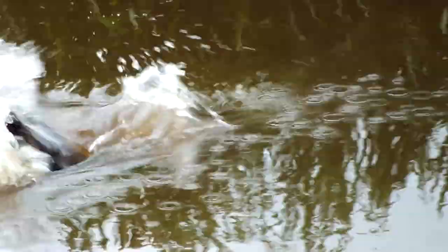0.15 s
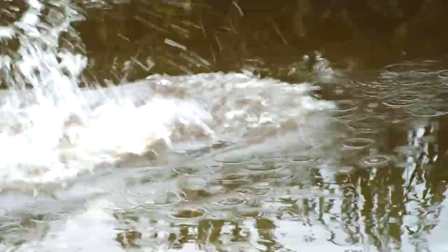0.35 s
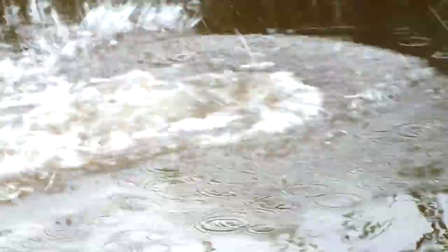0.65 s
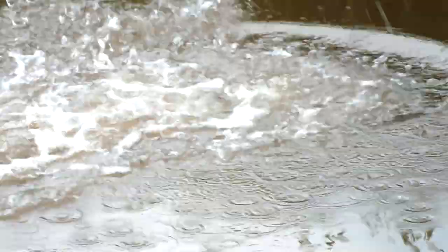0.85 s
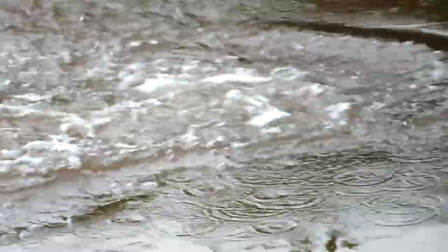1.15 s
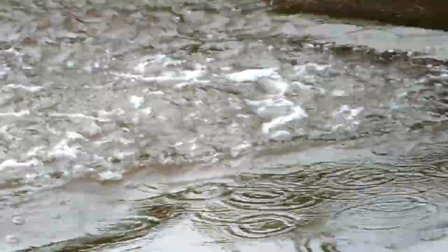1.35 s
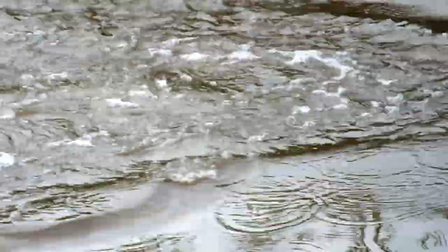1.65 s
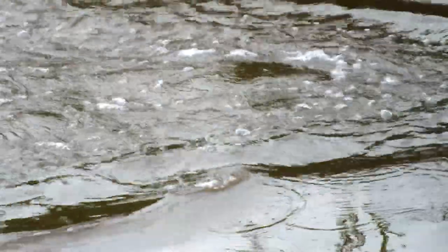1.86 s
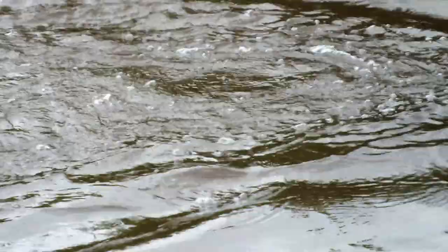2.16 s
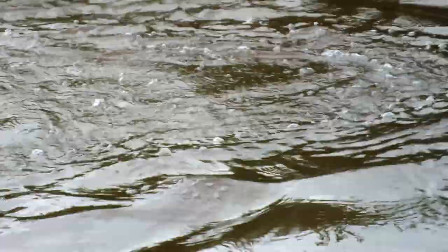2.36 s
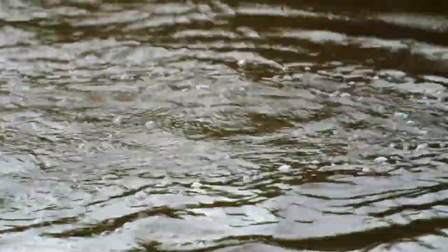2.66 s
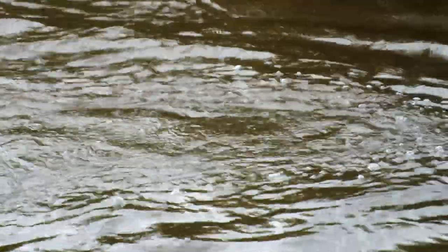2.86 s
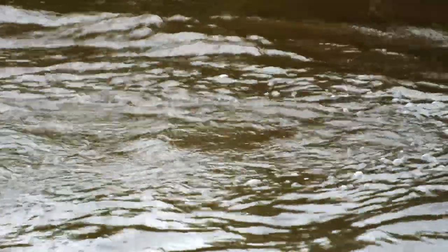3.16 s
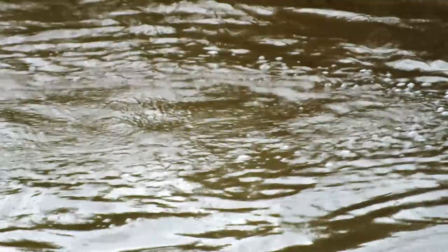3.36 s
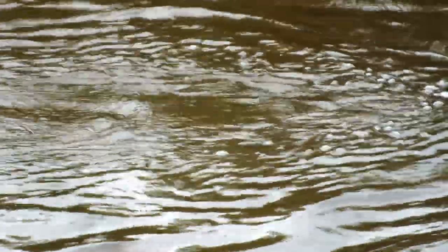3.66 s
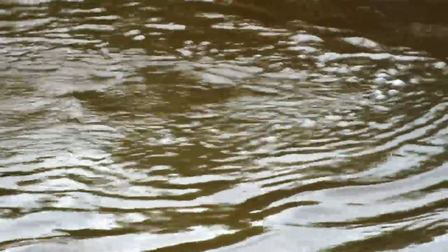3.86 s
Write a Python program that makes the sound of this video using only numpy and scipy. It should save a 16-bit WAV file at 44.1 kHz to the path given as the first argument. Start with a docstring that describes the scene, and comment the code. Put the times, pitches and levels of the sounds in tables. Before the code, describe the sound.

An animal splashes into a river, followed by quiet birdsong and handling knocks.

```python
"""On a quiet river bank, a beaver slaps the water with its tail and dives. Trapped air resonates as
bubbles: large pockets gulp, foam churns, and spray rains back, thinning to single droplets.
A small bird sings frequency-modulated tones, whistles and trills, scattered by the trees.
Close by, bumps and knocks excite the modes of a hand-held microphone, and a sleeve rustles by friction.
Soft open air and a distant hum lie underneath."""
import sys
import numpy as np
from scipy import signal
from scipy.io import wavfile

SR = 44100
rng = np.random.default_rng(int(sys.argv[2]) if len(sys.argv) > 2 else 0)


def store_wav(level_fs):
    """Save 16-bit WAV to argv[1]."""
    pcm = np.round(np.clip(np.atleast_2d(level_fs), -1, 1) * 32767)
    wavfile.write(sys.argv[1], SR, pcm.T.astype(np.int16))


N = 176400
T = np.arange(N) / SR


# gurgle of the cavity left by the tail: (time [s], level [dB])
GURGLE = [(0.0, -32), (0.03, -49), (0.054, -32), (0.342, -40.5), (0.366, -43.5), (1.022, -61), (1.1, -80)]
# the tail's sharp slap on the water (first row), then single large bubbles: (time [s], frequency [Hz], level
# [dB], ring length [cycles])
GULPS = [(0.0533, 676, -12, 4.4), (.071, 403.6, -25, 22), (0.09, 2300, -23.5, 4), (.122, 505, -25, 21),
         (.141, 399, -24, 19), (.149, 383, -18, 10.3), (0.173, 1210, -21.5, 10.4), (0.199, 395, -26, 14),
         (0.218, 390, -24.5, 17), (0.264, 427, -28, 13), (0.296, 440, -21.5, 13), (0.33, 481, -26.5, 24),
         (.372, 920, -32.5, 29), (.497, 837, -34, 47), (.582, 1680, -30.5, 26), (0.655, 2190, -26, 4.3),
         (.716, 1830, -24.5, 9.2), (.717, 2750, -28, 20), (1.04, 2100, -45.5, 35)]

def cavity():
    """Bubble resonance: trapped air is a spring and the water a mass, so large pockets ring low."""
    swarm = bubbles(per_s=1100, low_hz=326.5, high_hz=607, cycles=12.1, size_db=2.5, spread_db=3.5)
    out = level(GURGLE) * from_db(-3) * swarm
    for s, hz, db, cycles in GULPS:
        add(out, s, from_db(db) * bubble(hz, cycles))
    return out


# churning of the foam: (time [s], level [dB])
FOAM_ENVELOPE = [(0, -39), (.035, -42.5), (.055, -33.5), (.1, -37.5), (.21, -40), (.265, -36), (.33, -35.5),
                 (.41, -41.5), (.55, -40), (.67, -39), (.75, -45), (.9, -48.5), (1.0, -55.5), (1.25, -92),
                 (1.45, -85)]
# colour of the foam: (frequency [Hz], level [dB])
FOAM_SPECTRUM = [(350, -16), (600, -7), (645, -16), (860, 0.5), (1080, -15), (1230, -0.5), (1500, -4),
                 (2100, 2.5), (2950, -17), (3410, -17.5), (7000, -34.5), (9100, -61), (15400, -120)]
# ringing hollows in the foam: (frequency [Hz], bandwidth [Hz], level [dB])
HOLLOWS = [(864, 112, -5.5), (1235, 210, -6), (1760, 200, -13.5)]
# left-right likeness of the water sounds: (frequency [Hz], correlation [-1 to 1])
WATER_CORRELATION = [(300, 0.98), (1400, 0.8), (3100, 0.17), (7000, 0.29), (15000, 1)]

def foam():
    """Incoherent superposition: many small bubbles merge into noise, while hollows ring in narrow bands."""
    ringing = from_db(-5.5) * bubbles(per_s=1800, low_hz=775, high_hz=4164, cycles=23,
                                      size_db=3, spread_db=5.5, spectrum=FOAM_SPECTRUM)
    for hz, width, db in HOLLOWS:
        ringing += from_db(db - 14 * T) * band(hz - width / 2, hz + width / 2, size=N)
    churn = from_db(-5) * noise(FOAM_SPECTRUM, WATER_CORRELATION, patchy_db=4, flicker_hz=28)
    return level(FOAM_ENVELOPE) * (ringing + churn)


# air buffeting the microphone as the tail comes down: (time [s], level [dB])
BUFFET_ENVELOPE = [(0, -33), (.04, -43), (.1, -47), (.2, -55)]
# colour of the buffet: (frequency [Hz], level [dB])
BUFFET_SPECTRUM = [(20, -18), (45, 11), (75, -7), (130, -9), (300, -36)]

def tail_slap():
    """Volume displacement: the tail's push radiates one deep pressure pulse and drives a puff of air."""
    from_peak = T - .0785
    thump = from_db(-31) * np.exp(-(from_peak / .011) ** 2) * np.cos(2 * np.pi * 75 * from_peak)
    buffet = level(BUFFET_ENVELOPE) * noise(BUFFET_SPECTRUM, WATER_CORRELATION, patchy_db=0)
    return (thump + buffet) * pan(db=3)


# spray thrown up and falling back: (time [s], level [dB])
SPRAY_ENVELOPE = [(0, -57.5), (.035, -64), (.07, -57), (.2, -59.5), (.25, -54), (.27, -47), (.3, -59),
                  (.38, -58), (.46, -56), (.66, -56.5), (.76, -59), (.95, -68), (1.1, -71), (1.45, -77)]
# hiss of the spray: (frequency [Hz], level [dB])
SPRAY_SPECTRUM = [(2500, 6.5), (4000, 18), (6000, -15), (8000, 6), (11000, -5.5), (14000, -25),
                  (16000, -13)]
# single sharp drops: (time [s], frequency [Hz], level [dB])
DROPS = [(.267, 6400, -30.5), (.654, 4800, -25.5), (.917, 12100, -45), (.941, 6700, -36), (.985, 5900, -30),
         (1.006, 6230, -41), (1.141, 12000, -45), (1.198, 10300, -29.5), (1.199, 5800, -39),
         (1.258, 8000, -38), (1.311, 10000, -38), (1.321, 8550, -43), (1.365, 12500, -39),
         (1.42, 11800, -37)]

def spray():
    """Air entrainment: falling drops ring as tiny bubbles, a hiss when dense and ticks when sparse."""
    shower = bubbles(per_s=2800, low_hz=3040, high_hz=14300, cycles=13, size_db=3, spread_db=4)
    hiss = noise(SPRAY_SPECTRUM, WATER_CORRELATION, patchy_db=6.5, flicker_hz=56)
    out = level(SPRAY_ENVELOPE) * (from_db(-4) * shower + from_db(2.5) * hiss)
    for s, hz, db in DROPS:
        add(out, s, from_db(db) * bubble(hz, cycles=5.1))
    # a fine patter rises from 0.3 to 0.8 s, then weakens and is gone at 1.46 s
    patter = bubbles(per_s=700, low_hz=6000, high_hz=13000, cycles=9, size_db=4, spread_db=4)
    fade = np.interp(T, [.3, .8, 1.32, 1.46], [0, 1, 1, 0])
    out += fade * from_db(-64 - 12 * np.maximum(T - .8, 0)) * patter
    # all but the very top lies to the left
    lower = signal.sosfiltfilt(signal.butter(2, 9500, fs=SR, output="sos"), out + 1e-18)
    top = out - lower
    return lower * pan(db=8) + top


def note(length, first_hz, middle_hz, last_hz, db, swell_db, trill_hz=0, depth_first=0, depth_last=0):
    """Frequency modulation: a whistle wavers along an arc, and a trill sweeps it up and down."""
    t = T[:int(length * SR)]
    progress = t / length
    arc = np.polyfit([0, .5, 1], [first_hz, middle_hz, last_hz], 2)
    hz = np.polyval(arc, progress) + 18 * drift(90)[:len(t)]
    depth = np.maximum(depth_first + (depth_last - depth_first) * progress, 0)
    depth *= 1 + .15 * drift(20)[:len(t)]
    turn = 2 * np.pi * trill_hz * t
    sweep = -depth * np.cos(turn + .18 * np.cos(turn))   # climbs slowly, falls fast
    pulse_db = 5 * sweep / max(depth_first, depth_last, 1)   # louder at the top of each sweep
    edges = np.sin(np.pi / 2 * np.clip(np.minimum(t, length - t) / .021, 0, 1)) ** 2
    envelope = edges * from_db(db + swell_db * (progress - .5) + pulse_db)
    return envelope * np.sin(2 * np.pi * np.cumsum(hz + sweep) / SR)


# plain notes: (time [s], length [s], first pitch [Hz], middle pitch [Hz], last pitch [Hz],
# level [dB], swell [dB])
WHISTLES = [(1.865, .055, 1920, 1900, 1780, -54, 0), (1.92, .045, 2780, 2640, 2200, -51, 10),
            (1.943, .073, 2420, 1985, 1960, -39, 4), (2.12, .07, 2480, 2750, 3050, -58, 0),
            (2.148, .1, 1880, 2025, 1920, -42, 16), (2.236, .046, 1900, 1940, 1860, -40.5, -3),
            (2.575, .08, 2920, 2900, 2920, -55, 5), (2.643, .055, 2860, 3010, 2720, -38.5, -2),
            (2.68, .048, 2860, 2590, 2470, -41.5, 3), (3.202, .092, 1950, 1925, 1740, -39.5, -5),
            (3.28, .08, 1800, 1650, 1600, -53, 0), (3.75, .085, 2190, 2160, 2150, -54, 2)]
# swept notes: (the columns of WHISTLES, sweep rate [Hz], first depth [Hz], last depth [Hz])
TRILLS = [(2.271, .198, 2030, 2130, 2230, -46, -3, 30.5, 210, 320),
          (2.955, .205, 2380, 2260, 2150, -42, 13, 52, 330, -60)]

def bird():
    """Scattering: the direct song is followed by a faint, exponentially decaying echo from the trees."""
    song = np.zeros(N)
    for s, *shape in WHISTLES + TRILLS:
        add(song, s, note(*shape))
    song *= from_db(3 + 1.86 * drift(70))   # the level flutters
    trees = rng.standard_normal((2, SR)) * decay(db=0, t60=.11, samples=SR)
    echo = signal.fftconvolve(song[None], trees / np.linalg.norm(trees[0]), axes=1)[:, :N]
    return from_right(song, lag_s=.00013) * pan(db=-.8) + from_db(-9) * echo


# hard knocks on the casing: (time [s], level [dB])
KNOCKS = [(2.499, -26.5), (2.8007, -11), (3.359, -32.5), (3.9169, -11.5)]
# modes they excite: (frequency [Hz], level [dB], 60 dB decay time [s])
KNOCK_MODES = [(282, -24.5, 0.062), (423, -19, 0.056), (689, 0, 0.013), (1110, 7, 0.0042), (1530, -7, 0.04),
               (2380, -40, 0.0098)]

def knocks():
    """Impact excitation: a hard contact rings the casing's modes and adds a dry crack."""
    out = np.zeros(N)
    for s, db in KNOCKS:
        blow = strike(KNOCK_MODES)
        crack = band(1220, 2610, size=len(blow)) * decay(db=-15.5, t60=.012, samples=len(blow))
        add(out, s, from_db(db) * (blow + crack))
    return from_right(low_pass(out, hz=3000), lag_s=.00031)


# soft bumps of the hand: (time [s], level [dB], left over right [dB])
BUMPS = [(.657, -32.5, -18), (.69, -50, -17), (0.955, -31, -15), (0.973, -43, -18), (1.136, -44, -10),
         (1.489, -31, -14), (1.519, -34, -19), (1.83, -40, -8), (1.934, -41, -12), (2.298, -39, -11),
         (3.358, -38, -8), (3.497, -39.5, 3.5), (3.652, -41.5, 11)]
# modes they excite: (frequency [Hz], level [dB], 60 dB decay time [s])
BUMP_MODES = [(120.6, -8.5, 0.21), (193, 0.5, 0.063), (280, 1, 0.04), (610, 1.5, 0.0059)]

def bumps():
    """Damped vibration: a soft contact excites only low modes and a brief shudder."""
    out = np.zeros((2, N))
    for s, db, pan_db in BUMPS:
        blow = strike(BUMP_MODES)
        shudder = rms_one(low_pass(np.diff(rng.standard_normal(len(blow) + 1)), hz=220))
        blow += shudder * decay(db=-21.5, t60=.18, samples=len(blow))
        add(out, s, from_db(db - abs(pan_db) / 2) * pan(pan_db) * blow)
    return out


# small scrapes on the casing: (time [s], level [dB], 60 dB decay time [s])
SCRAPES = [(2.498, -44, .018), (2.8035, -28, 0.0088), (3.507, -47, .014), (3.95, -43, 0.024)]

def scrapes():
    """Transient friction: each short slip gives a burst of noise that dies at once."""
    out = np.zeros(N)
    for s, db, t60 in SCRAPES:
        grit = signal.lfilter(*signal.butter(1, 2640, fs=SR), rng.standard_normal(SR // 20))
        add(out, s, rms_one(grit) * decay(db, t60, len(grit)))
    return out


# strokes of the sleeve: (centre time [s], half width [s], level [dB])
STROKES = [(2.6, 0.072, -44.5), (2.686, 0.064, -41), (2.77, 0.05, -45), (2.949, 0.072, -48),
           (3.1, 0.048, -51), (3.24, 0.096, -54), (3.388, 0.049, -46.5), (3.509, 0.079, -52),
           (3.605, 0.044, -46.5), (3.667, 0.032, -44), (3.776, 0.044, -46.5), (3.872, 0.054, -47.5)]
# colour of the rubbing cloth: (frequency [Hz], level [dB])
SLEEVE_SPECTRUM = [(300, 2), (600, 0.5), (1200, 2.5), (2000, 0), (3500, -9.5), (6000, -23), (10000, -24.5),
                   (16000, -41)]
# left-right likeness of sleeve and grip: (frequency [Hz], correlation [-1 to 1])
HAND_CORRELATION = [(100, 0.18), (400, 0.4), (1000, 0.23), (10000, 0.12)]

def sleeve():
    """Sliding friction: cloth noise swells and stops with each stroke; overlapping strokes add in power."""
    steepness = 2.5   # 2 is a soft bell; higher starts and stops more abruptly
    power = sum(from_db(db) ** 2 * np.exp(-2 * np.abs((T - s) / width) ** steepness)
                for s, width, db in STROKES)
    cloth = noise(SLEEVE_SPECTRUM, HAND_CORRELATION, patchy_db=2.5, flicker_hz=95)
    return from_right(np.sqrt(power) * cloth, lag_s=.00014)


# rumble of the shifting grip: (time [s], level [dB])
GRIP_ENVELOPE = [(2.15, -67), (2.29, -49.5), (2.5, -52.5), (2.63, -42), (2.82, -45), (3.0, -53.5),
                 (3.2, -63.5), (3.45, -52.5), (3.65, -50), (3.8, -52.5), (4, -48.5)]
# colour of the rumble: (frequency [Hz], level [dB])
GRIP_SPECTRUM = [(40, -2), (90, -10), (150, -2.5), (210, 4), (300, -10), (500, -15), (1200, -39),
                 (3000, -80)]

def grip():
    """Structure-borne sound: the shifting hand reaches the microphone as a low rumble."""
    return level(GRIP_ENVELOPE) * noise(GRIP_SPECTRUM, HAND_CORRELATION, patchy_db=2.2, flicker_hz=25)


# open air over the bank: (frequency [Hz], level [dB])
AIR_SPECTRUM = [(47, -40), (80, 5), (119, -7.5), (152, -7), (206, -4), (391, -10), (456, -2.5), (498, -9),
                (809, -5.5), (1370, -12), (1500, -10.5), (3780, -19), (15500, -49.5)]
# left-right likeness of the air: (frequency [Hz], correlation [-1 to 1])
AIR_CORRELATION = [(60, -0.32), (130, 0.64), (300, 0.16), (640, 0.24), (1400, 0.021), (5000, -0.55),
                   (15000, 0.42)]
# faint narrow bands of far hiss: (frequency [Hz], bandwidth [Hz], level [dB])
HISS_BANDS = [(3740, 130, -75.5), (6230, 120, -83.5)]

def bank():
    """Ambient noise floor: broadband air, narrowband hiss and a low, slightly unsteady distant hum."""
    hum_phase = 2 * np.pi * 49.7 * T + .25 * drift(2)
    hum = np.sqrt(2) * np.sin(hum_phase) * from_db(-57.5 + 1.3 * drift(4))
    hiss = sum(from_db(db) * band(hz - width / 2, hz + width / 2, size=(2, N))
               for hz, width, db in HISS_BANDS)
    return hum + hiss + from_db(-51) * noise(AIR_SPECTRUM, AIR_CORRELATION, patchy_db=2)


def bubble(hz, cycles):
    """Damped oscillator: a sine that falls 40 dB over its ring length while its pitch climbs."""
    age = np.arange(int(cycles / hz * SR) + 2) * hz / SR   # in periods of the starting pitch
    phase = 2 * np.pi * age * (1 + .095 * age / cycles)
    return np.sin(phase) * from_db(-40 * age / cycles) * (1 - np.exp(-4 * age))


def bubbles(per_s, low_hz, high_hz, cycles, size_db, spread_db, spectrum=None, span_s=1.6):
    """Shot noise: bubbles of random time, pitch, strength and place; unit power over the span."""
    out = np.zeros((2, N))
    for when, pitch, size, place in rng.random((int(per_s * span_s), 4)):
        hz = low_hz * (high_hz / low_hz) ** pitch
        db = size_db * min(-np.log(1 - size), 4)   # many weak, few strong
        if spectrum:
            db += at_hz(spectrum, hz) + 10 * np.log10(hz)   # offsets the shorter ring of high bubbles
        add(out, when * span_s, from_db(db) * pan(spread_db * (2 * place - 1)) * bubble(hz, cycles))
    return rms_one(out) * np.sqrt(span_s * SR / N)


def strike(modes):
    """Modal superposition: decaying sines of alternating sign, each with a slightly random strength."""
    t = T[:SR // 5]
    return sum((-1) ** k * decay(db + rng.normal(0, 1), t60, len(t)) * np.sin(2 * np.pi * hz * t)
               for k, (hz, db, t60) in enumerate(modes))


def noise(spectrum, correlation, patchy_db, flicker_hz=12):
    """Amplitude modulation: half-octave bands of stereo noise flicker, partly in step; unit power."""
    out, shared_drift = 0, drift(flicker_hz)
    edges = np.geomspace(22, 16500, 20)
    white = rng.standard_normal((2, 2, N))
    for k, (low, high) in enumerate(zip(edges, edges[1:])):
        hz = np.sqrt(low * high)
        mid, side = signal.sosfilt(signal.butter(2, [low, high], "band", fs=SR, output="sos"), white[k % 2])
        alike = at_hz(correlation, hz)
        skirt = min(hz / spectrum[0][0], spectrum[-1][0] / hz, 1) ** 2   # roll-off beyond the spectrum
        flicker_db = patchy_db * (shared_drift + drift(flicker_hz)) / 2
        gain = skirt * from_db(at_hz(spectrum, hz) + flicker_db)
        out = out + gain * (np.sqrt(1 + alike) * mid + np.sqrt(1 - alike) * side * [[1], [-1]])
    return rms_one(out)


def band(low_hz, high_hz, size):
    """Band-limited noise of unit power."""
    band_pass = signal.butter(2, [low_hz, high_hz], "band", fs=SR, output="sos")
    return rms_one(signal.sosfilt(band_pass, rng.standard_normal(size)))


def drift(hz):
    """Low-pass random process: slow wandering with a spread of 1."""
    step, settle = 40, 2000
    pole = np.exp(-2 * np.pi * hz * step / SR)
    white = rng.standard_normal(N // step + settle + 2)
    slow = signal.lfilter([1], [1, -2 * pole, pole * pole], white)[settle:]
    return np.interp(np.arange(N) / step, np.arange(len(slow)), rms_one(slow))


def from_db(db):
    """Decibels to amplitude ratio."""
    return 10 ** (np.asarray(db) / 20)


def rms_one(x):
    """Normalisation to unit power."""
    return x / np.sqrt(np.mean(x ** 2) + 1e-20)


def decay(db, t60, samples):
    """Exponential decay: 60 dB down every t60 seconds."""
    return from_db(db - 60 * T[:samples] / t60)


def level(rows):
    """Amplitude envelope along a dB curve, falling 200 dB/s outside it."""
    s, db = np.transpose(rows)
    outside = np.maximum(s[0] - T, 0) + np.maximum(T - s[-1], 0)
    return from_db(np.interp(T, s, db) - 200 * outside)


def at_hz(points, hz):
    """Interpolation on a log-frequency axis."""
    frequencies, values = np.transpose(points)
    return np.interp(np.log(hz), np.log(frequencies), values)


def pan(db):
    """Level difference between channels: positive lies to the left."""
    return from_db(np.array([[db], [-db]]) / 2)


def from_right(x, lag_s):
    """Arrival-time difference: the left channel hears it later."""
    left, right = np.broadcast_to(x, (2, N))
    return np.array([np.interp(T - lag_s, T, left), right])


def add(out, s, sound):
    """Superposition of a short sound, starting at s seconds."""
    start = int(s * SR)
    n = min(sound.shape[-1], N - start)
    out[..., start:start + n] += sound[..., :n]


def low_pass(x, hz):
    """Second-order roll-off of the treble."""
    return signal.sosfilt(signal.butter(2, hz, fs=SR, output="sos"), x + 1e-18)


def scene():
    """Linear superposition: the pressures of water, bird, handling and background add."""
    high_pass = signal.butter(2, 230, "high", fs=SR, output="sos")
    water = signal.sosfilt(high_pass, cavity() + foam()) + tail_slap() + spray()
    return water + bird() + knocks() + bumps() + scrapes() + sleeve() + grip() + bank()


def record(dry):
    """Band limiting: an elliptic low-pass cuts steeply above 15.7 kHz."""
    return signal.sosfilt(signal.ellip(10, .2, 80, 15700, fs=SR, output="sos"), dry)


dry = scene()
out = record(dry)
store_wav(out)
```